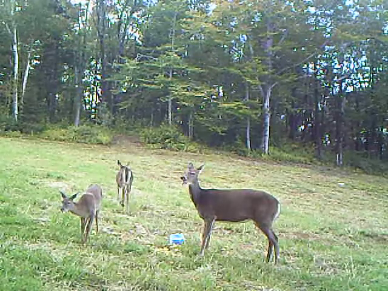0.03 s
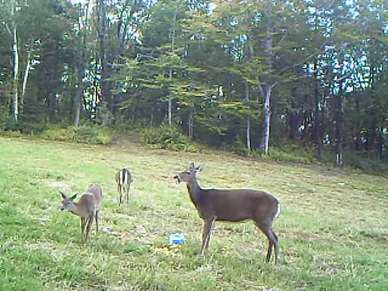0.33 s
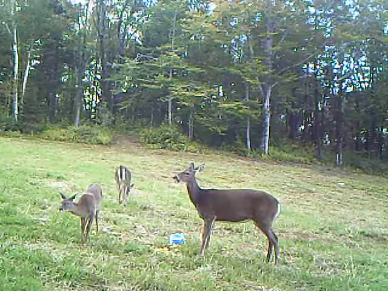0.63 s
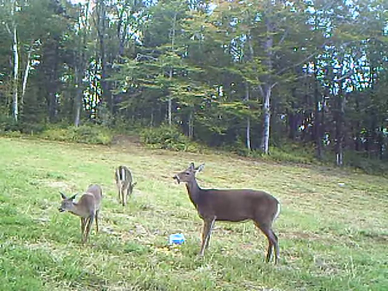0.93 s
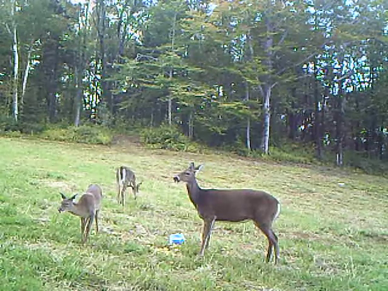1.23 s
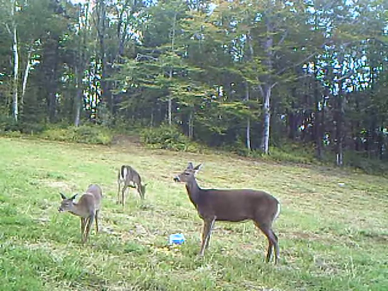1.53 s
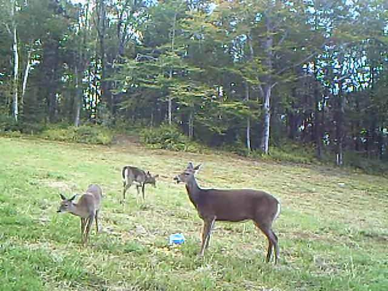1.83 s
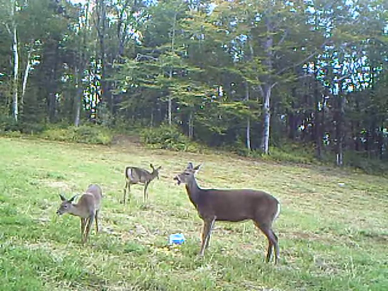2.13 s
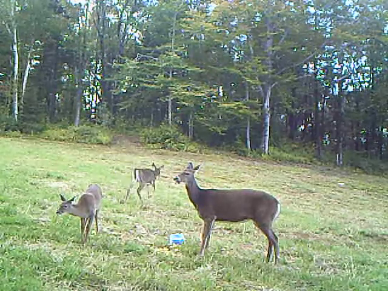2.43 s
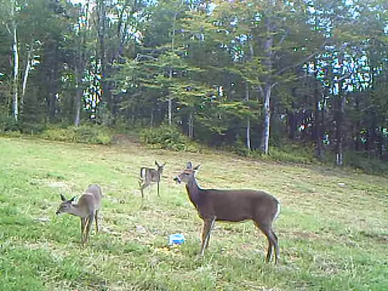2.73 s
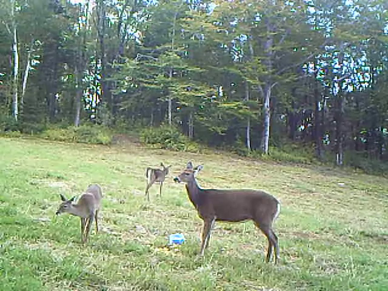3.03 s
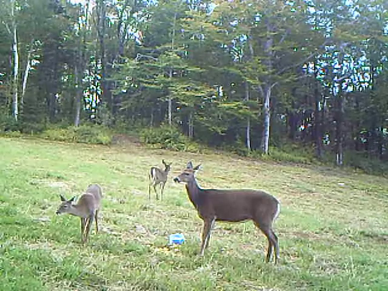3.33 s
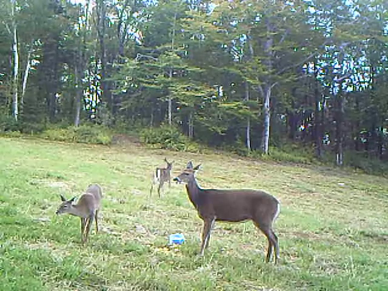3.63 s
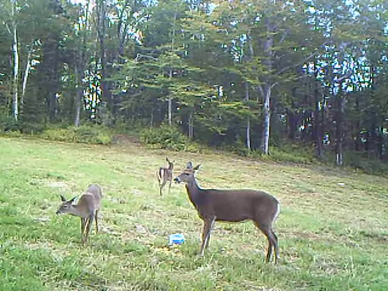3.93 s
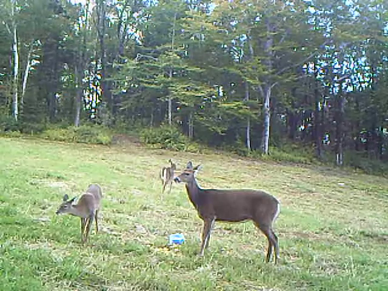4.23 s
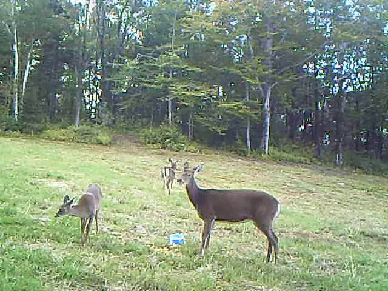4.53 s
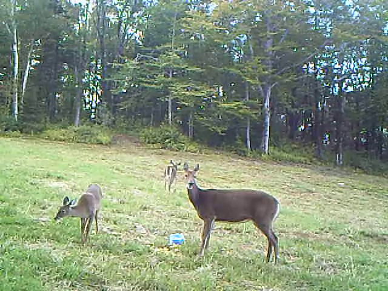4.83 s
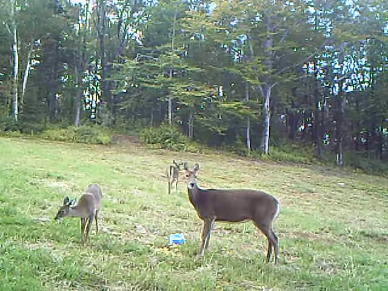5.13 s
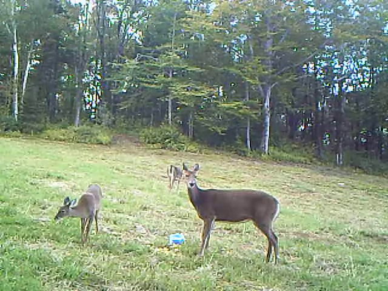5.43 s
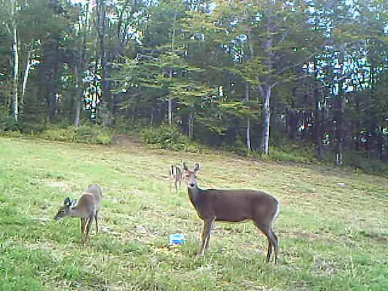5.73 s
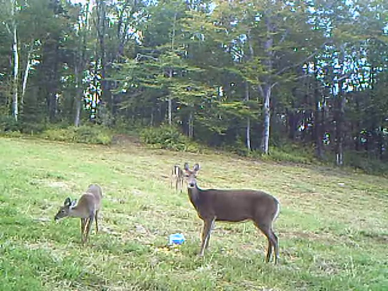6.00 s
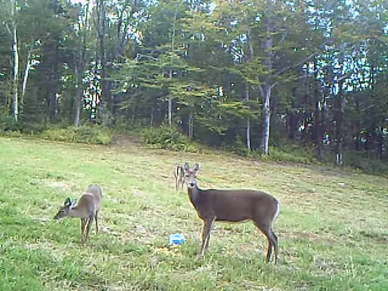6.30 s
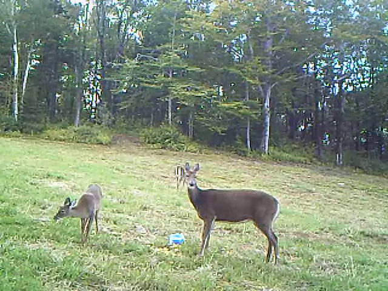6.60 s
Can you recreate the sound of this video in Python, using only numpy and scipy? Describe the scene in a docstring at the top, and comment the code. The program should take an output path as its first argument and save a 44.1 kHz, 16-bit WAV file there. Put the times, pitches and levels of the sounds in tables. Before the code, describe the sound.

Light wind puffs bump the microphone over a quiet, steady hiss, while grazing deer make faint ticks and small snaps in the grass.

```python
"""The edge of a forest clearing where deer feed, in still air, heard through a small camera microphone.
A dull far wash and a faint leaf hiss, coloured by the microphone's ring near 3 kHz, form the bed.
Light puffs of wind rumble on the microphone port, and single eddies bump it.
Cropped grass ticks softly, and now and then a dry stalk snaps under the animals."""
import sys
import numpy as np
from scipy import signal
from scipy.fft import rfft, irfft
from scipy.io import wavfile
from scipy.ndimage import uniform_filter1d

SR = 44100
rng = np.random.default_rng(int(sys.argv[2]) if len(sys.argv) > 2 else 0)


def transcribe(u):
    """Save the signal u as a 16-bit wav file named by the first command-line argument.

    u: samples, shape (n,) or (channels, n), limited to [-1, 1]; the rate is SR.
    q: integer samples, one column per channel.
    """
    v = np.clip(np.atleast_2d(u).T, -1, 1)
    q = np.round(v * 32767).astype(np.int16)
    wavfile.write(sys.argv[1], SR, q)


N = 302526
TIME_S = np.arange(N) / SR
MIC_RING_HZ = 3530


def from_db(db):
    """Decibels to gain."""
    return 10 ** (np.asarray(db) / 20)


def unit_rms(x):
    """Scale to unit power."""
    return x / np.sqrt(np.mean(x ** 2) + 1e-20)


def noise(spectrum):
    """Unit-power noise shaped by an EQ curve, rolling off beyond both ends of it."""
    points_hz, level_db = np.transpose(spectrum)
    hz = np.maximum(np.arange(N // 2 + 1) * SR / N, 1)
    gain = from_db(np.interp(np.log(hz), np.log(points_hz), level_db))
    roll_off = np.minimum(hz / points_hz[0], 1) ** 2 * np.minimum(points_hz[-1] / hz, 1) ** 2
    return unit_rms(irfft(rfft(rng.standard_normal(N)) * gain * roll_off, N))


def drift(per_s):
    """Slow random modulation of unit power."""
    knots = rng.standard_normal(2048)
    return unit_rms(np.interp(TIME_S * per_s, np.arange(len(knots)), knots))


def levelled(x, span_s):
    """Ride the gain so that the power holds steady over the given span."""
    power = uniform_filter1d(np.abs(signal.hilbert(x)) ** 2, int(span_s * SR))
    return unit_rms(x / np.sqrt(power + 1e-6))


def resonance(x, hz, width_hz):
    """Two-pole resonance with unity gain at its peak."""
    radius = np.exp(-np.pi * width_hz / SR)
    feedforward = np.array([1, 0, -1]) * (1 - radius ** 2) / 2
    feedback = [1, -2 * radius * np.cos(2 * np.pi * hz / SR), radius ** 2]
    return signal.lfilter(feedforward, feedback, x + 1e-18)


# Near-flat circuit hiss: (frequency [Hz], relative level [dB])
CIRCUIT_HISS_EQ = [(100, -0.5), (4000, 0.5), (8000, -0.8), (12000, -2.5), (16000, -3.5)]
# Thin electronic whine: (frequency [Hz], rms level [dB])
WHINE_TONES = [(13629, -96.2), (15625, -97.5)]


def electronics(hiss_db=-77):
    """The camera's circuits lay down the noise floor: even hiss and two steady tones."""
    whine = sum(np.sqrt(2) * from_db(db) * np.sin(2 * np.pi * hz * TIME_S) for hz, db in WHINE_TONES)
    return whine + from_db(hiss_db) * noise(CIRCUIT_HISS_EQ)


# Dark wash of distant air: (frequency [Hz], relative level [dB])
FAR_AIR_EQ = [(60, 0.5), (110, 2), (170, 0.5), (260, -4), (370, -6), (540, -9), (950, -10), (1400, -15),
              (2200, -17), (4000, -28), (8000, -37)]


def far_air(level_db=-70):
    """A dull wash from far off, its level wavering slightly."""
    return from_db(level_db + 0.56 * drift(per_s=4.3)) * noise(FAR_AIR_EQ)


# Leaf hiss, peaking at the microphone's ring: (frequency [Hz], relative level [dB])
LEAF_EQ = [(1500, -15.5), (2200, -14), (2700, -6.5), (3000, -3), (3270, -0.5), (3600, -5), (4100, -10.5),
           (5000, -18), (7000, -29.5), (12000, -25.5)]


def leaves(start_db=-71, rest_db=-73.5, fall_db_per_s=0.54):
    """A fine, restless hiss of leaves that settles as the breeze drops."""
    level_db = np.maximum(start_db - fall_db_per_s * TIME_S, rest_db)
    return from_db(level_db + 0.6 * drift(per_s=25)) * noise(LEAF_EQ)


def grass_ticks(per_s=9, impulse_db=-42):
    """Grass being cropped: tiny clicks ring the microphone, barely above the hiss."""
    onsets = rng.random(N) < per_s / SR
    strengths = from_db(impulse_db) * rng.uniform(0.69, 1, N)
    return resonance(onsets * strengths, MIC_RING_HZ, width_hz=1000)


def gust_envelope(start_s, length_s, attack_s=0.07, release_s=0.055):
    """A puff rises, holds and dies away."""
    rise = np.clip((TIME_S - start_s) / attack_s + 0.5, 0, 1)
    return rise * np.exp(-np.maximum(TIME_S - start_s - length_s, 0) / release_s)


# Sub-bass sway of large eddies: (frequency [Hz], relative level [dB])
SWAY_EQ = [(9, -1), (14, 6.5), (21, 0.5), (30, -13), (45, -24), (70, -38)]
# Low rumble of small eddies: (frequency [Hz], relative level [dB])
BUFFET_EQ = [(22, -4), (45, 3), (70, -2), (92, -5.5), (140, -17), (200, -32), (300, -37.5), (600, -51)]
# Puffs reaching the port: (start [s], length [s], sway level [dB], buffet level [dB])
GUST_CUES = [(0.0, 0.46, -44.5, -73), (0.99, 0.11, -47.5, -70), (1.438, 0.95, -45.5, -64.5),
             (1.692, 0.098, -41.5, -50.5), (1.94, 0.1, -56, -45.5), (2.984, 0.43, -46.5, -56),
             (3.62, 0.32, -49.5, -68), (4.342, 0.071, -48, -72.5), (5.622, 0.068, -50, -63),
             (5.988, 0.73, -53.5, -71.5)]


def wind(calm_sway_db=-52, calm_buffet_db=-66, fall_db_per_s=0.44, swell_db=2.5):
    """Large eddies sway the diaphragm in uneven swells; small ones buffet it in the puffs."""
    breeze_fade = from_db(-fall_db_per_s * TIME_S)
    sway_gain = breeze_fade * from_db(calm_sway_db)
    buffet_gain = breeze_fade * from_db(calm_buffet_db)
    for start_s, length_s, sway_db, buffet_db in GUST_CUES:
        puff = gust_envelope(start_s, length_s)
        sway_gain = np.hypot(sway_gain, from_db(sway_db) * puff)   # powers add
        buffet_gain = np.hypot(buffet_gain, from_db(buffet_db) * puff)
    sway = sway_gain * levelled(noise(SWAY_EQ), span_s=0.18)
    buffet = buffet_gain * levelled(noise(BUFFET_EQ), span_s=0.08)
    swells = from_db(swell_db * drift(per_s=8))
    return sway * swells + buffet


# Finer turbulence around an eddy: (frequency [Hz], relative level [dB])
WAKE_EQ = [(60, -1), (130, 0.5), (200, -9.5), (300, -18), (500, -32.5)]
# Single eddies bumping the port: (time [s], peak level [dB], pitch [Hz])
THUMP_CUES = [(1.473, -47, 26), (1.737, -41, 48), (1.882, -45, 62), (1.997, -40, 52), (2.04, -39.5, 66.4),
              (2.268, -36, 34), (2.467, -46.5, 26.8), (3.045, -44.5, 39), (3.388, -51.5, 73.6),
              (3.857, -59.5, 88.5), (5.656, -47, 42.2)]


def eddy_thumps(wake_db=-20.5, wake_half_width_s=0.027):
    """An eddy pushes the air at the port, then pulls it back: one smooth swing in a short wake."""
    out = np.zeros(N)
    turbulence = levelled(noise(WAKE_EQ), span_s=0.057)
    for time_s, peak_db, hz in THUMP_CUES:
        offset_s = TIME_S - time_s
        phase = 2 * np.pi * hz * offset_s
        swing = -phase * np.exp((1 - phase ** 2) / 2)
        wake = from_db(wake_db) * turbulence * np.exp(-(offset_s / wake_half_width_s) ** 2)
        out += from_db(peak_db) * (swing + wake)
    return out


# Dry stalks breaking: (time [s], pre-EQ level [dB], pitch [Hz], ring T60 [s], relative knock level [dB])
SNAP_CUES = [ (0.553, -55, 3180, 0.018, -18), (0.624, -56.5, 3470, 0.023, -25),
             (0.7898, -54.5, 3260, .024, -14), (0.801, -45, 2620, 0.011, -19),
             (0.807, -56, 3230, .010, -6.5), (1.1698, -49.5, 2860, 0.0084, -18),
             (2.2722, -47, 3100, .008, -17), (2.445, -53.5, 3200, .012, -24), (2.513, -54, 2870, .007, -25),
             (2.911, -45.5, 3250, 0.02, -36), (2.934, -57, 3230, 0.015, -23), (3.492, -57, 3680, .01, -27),
             (3.610, -57, 3350, .014, -24), (4.205, -58, 3300, 0.012, -17), (4.992, -54, 2980, .006, -24),
             (5.29, -46, 3550, 0.0066, -30), ]


def stalk_snaps(splinter_gain=0.24, splinter_s=0.0084, knock_t60_s=0.027, mic_ring_gain=0.66):
    """Each stalk breaks with a short ringing crack, a spray of splinters and a duller knock."""
    out = np.zeros(N)
    t = np.arange(SR // 10) / SR
    for time_s, level_db, hz, t60_s, knock_db in SNAP_CUES:
        crack = np.sin(2 * np.pi * hz * t) * from_db(-60 * t / t60_s)
        fibres = unit_rms(resonance(rng.standard_normal(len(t)), hz, width_hz=1250))
        splinters = splinter_gain * fibres * np.exp(-2 * t / splinter_s)
        ground = unit_rms(resonance(rng.standard_normal(len(t)), hz=1250, width_hz=140))
        knock = ground * from_db(knock_db - 60 * t / knock_t60_s)
        start = round(time_s * SR)
        out[start:start + len(t)] += from_db(level_db) * (crack + splinters + knock)
    # the turf swallows the top of each snap, and the microphone adds its own ring
    turf_band = signal.butter(2, (510, 3640), "band", fs=SR, output="sos")
    muffled = signal.sosfilt(turf_band, out)
    return muffled + mic_ring_gain * resonance(muffled, MIC_RING_HZ, width_hz=400)


def scene():
    """All layers meet in mono at one microphone."""
    rumble = wind() + eddy_thumps()
    bed = far_air() + leaves()
    deer = stalk_snaps() + grass_ticks()
    return (rumble + bed + deer + electronics())[None]


def record(dry, fizz_db=-35, cutoff_hz=15720):
    """The camera's hiss swells with every large pressure swing; a steep low-pass cuts the top."""
    fizz = from_db(fizz_db) * np.abs(dry) * rng.standard_normal(dry.shape)
    low_pass = signal.ellip(12, 0.1, 70, cutoff_hz, fs=SR, output="sos")
    return signal.sosfilt(low_pass, dry + fizz)


dry = scene()
out = record(dry)
transcribe(out)
```